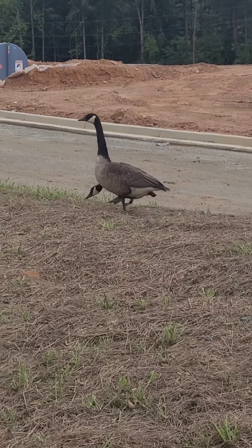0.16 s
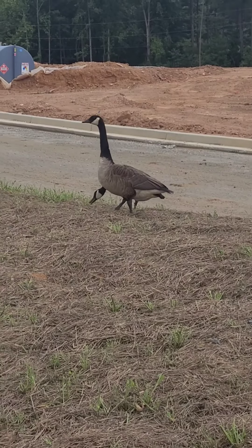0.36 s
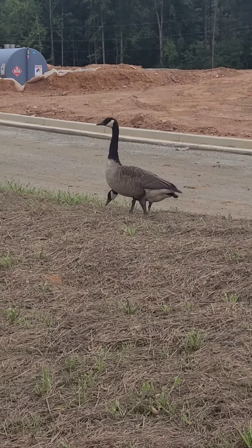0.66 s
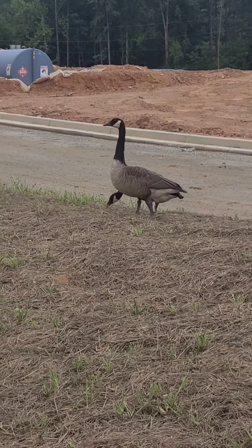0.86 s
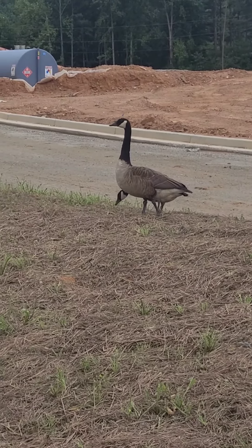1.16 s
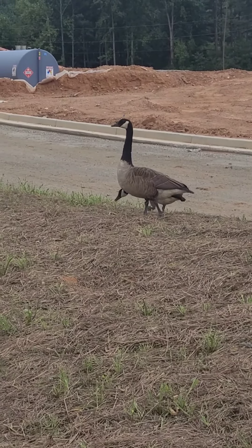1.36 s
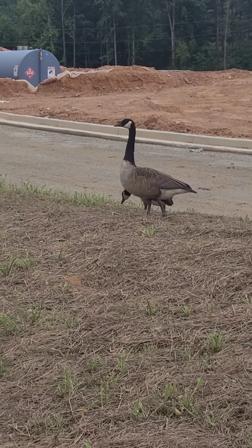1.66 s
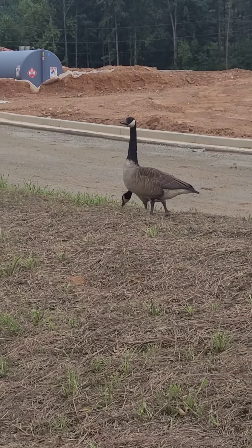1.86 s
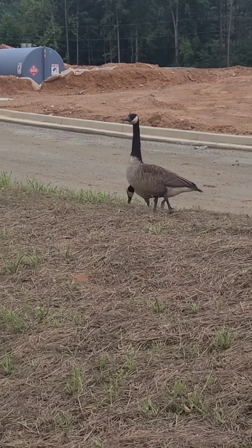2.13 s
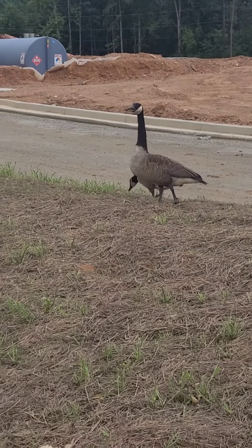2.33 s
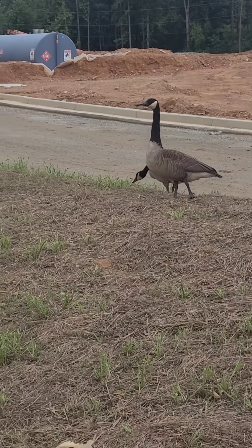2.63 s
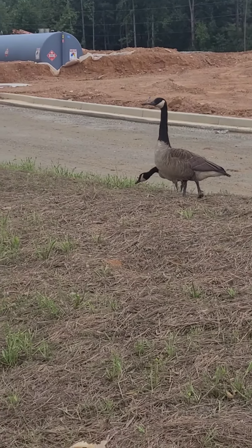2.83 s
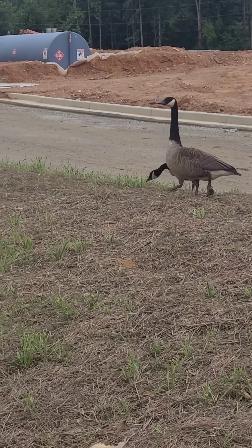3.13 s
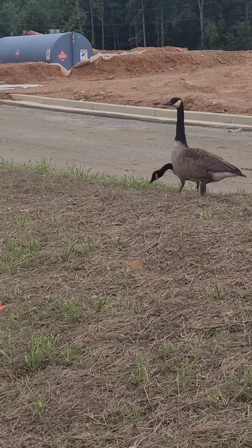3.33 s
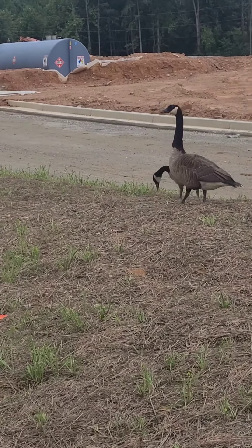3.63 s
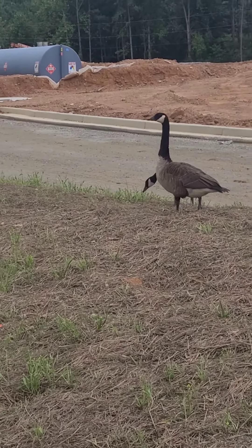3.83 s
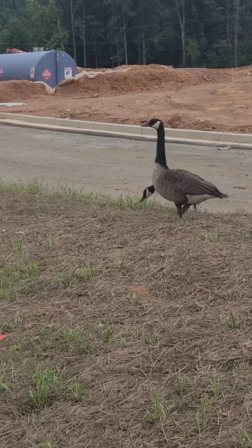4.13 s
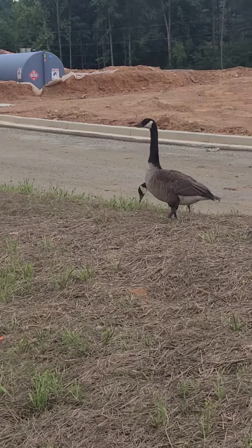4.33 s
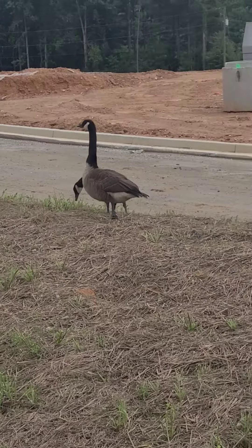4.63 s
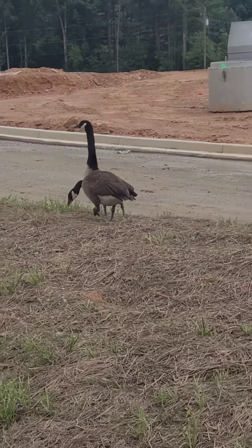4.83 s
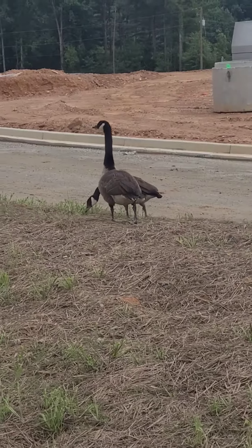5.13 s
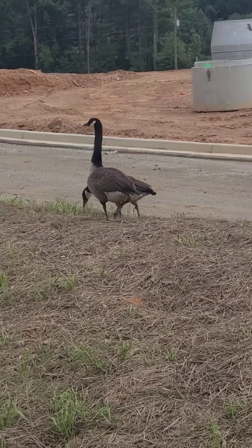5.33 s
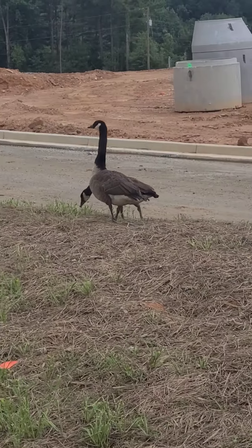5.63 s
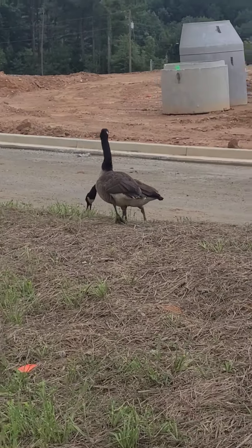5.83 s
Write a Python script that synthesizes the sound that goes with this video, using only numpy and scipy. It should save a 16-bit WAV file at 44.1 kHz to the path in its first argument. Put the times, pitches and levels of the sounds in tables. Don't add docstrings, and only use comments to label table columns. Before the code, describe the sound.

A goose gives a short grunt cracking into one honk over low distant traffic rumble, followed by dry grass ticking and rustling beside the microphone.

```python
import sys
import numpy as np
from scipy import signal
from scipy.fft import rfft, irfft
from scipy.io import wavfile
from scipy.ndimage import uniform_filter1d

SR = 44100
rng = np.random.default_rng(int(sys.argv[2]) if len(sys.argv) > 2 else 0)


def how_loud(loudness_db):
    steps = np.asarray(loudness_db, float) / 20
    return 10 ** steps


def generate_wav(sig):
    pcm = np.round(np.clip(np.atleast_2d(sig).T, -1, 1) * 32767).astype(np.int16)
    wavfile.write(sys.argv[1], SR, pcm)


N = 264159

# (frequency [Hz], density [dB per Hz])
RUMBLE = [(12, -37), (20, -27), (37, -0.5), (86, -1), (107, 1), (129, -1.5), (167, -1.5), (229, -6.5),
          (244, -10.5), (260, -10), (278, -11.5), (450, -29.5), (580, -61), (990, -120)]
# (frequency [Hz], density [dB per Hz])
TYRES = [(190, -39), (330, 0), (441, -6.5), (527, -2), (580, -1), (650, 2.5), (788, -1.5), (1110, -5),
         (1850, -19), (3150, -27), (4080, -36), (5460, -33), (6510, -48.5), (9440, -39), (15600, -61.5)]
# (frequency [Hz], left-right likeness [-1..1])
PORT_LIKENESS = [(60, 0.65), (130, 1), (290, 0.96), (640, 0.83), (1410, 0.87), (3100, -0.31),
                 (6820, -0.083), (15000, -0.17)]
# (start [s], end [s], first pitch [Hz], last pitch [Hz], level [dB])
DRONES = [(0, 1.2, 232, 234, -43), (1.1, 3.78, 234, 241.5, -37), (3.85, 4.6, 236, 238, -45),
          (4.7, 5.25, 243, 245, -41), (2.9, 3.95, 127, 128, -34), (4.2, 5.15, 128, 129.5, -32),
          (5.3, 5.7, 127, 128, -39), (5.85, 6.1, 128, 128.5, -32), (.7, 1.5, 102, 101, -38),
          (1.8, 2.7, 99, 99.5, -33), (2.8, 3.2, 99, 100, -38), (3.35, 4.0, 101, 101.5, -36),
          (4.45, 5.1, 100, 100.5, -35), (5.2, 6.1, 102, 101, -39), (.9, 1.45, 168, 166, -39),
          (1.5, 1.85, 178, 190, -38), (.1, 1.1, 79, 78, -37), (1.75, 2.3, 79, 60, -36),
          (4.1, 4.5, 72, 68, -37), (5.3, 5.65, 245, 246, -46), (5.65, 6.1, 246, 247, -40)]
# (time [s], pitch [Hz])
BIRD_PHRASES = [
    [(.895, 2900), (.925, 3080), (1.0, 3050), (1.04, 3200), (1.075, 3330), (1.11, 3600)],
    [(1.165, 3250), (1.23, 3300), (1.31, 3190), (1.35, 3200), (1.38, 3320), (1.43, 3330), (1.475, 2960)],
    [(1.525, 2970), (1.57, 3100), (1.625, 3440)],
    [(4.02, 5950), (4.115, 5830)],
    [(4.105, 5850), (4.21, 5900)],
    [(4.2, 5850), (4.3, 5760)],
    [(4.29, 5770), (4.345, 5520), (4.375, 4900), (4.397, 4480), (4.415, 4480), (4.44, 5000), (4.465, 5700)],
    [(4.49, 5980), (4.53, 5780), (4.57, 5680)],
    [(3.895, 10700), (3.915, 11000), (3.93, 11600), (3.945, 11500), (3.962, 10700)],
    [(3.97, 10600), (3.995, 10600), (4.012, 10150), (4.04, 9600), (4.065, 9600)],
]
BIRD_LEVELS = [-64.5, -64.5, -66.5, -70, -72, -67, -60.5, -67, -71, -73]
# (start [s], level [dB], centre [Hz], length [s],
# width [Hz])
FUZZY_SWELLS = [(1.09, -63, 4700, 0.09, 500), (5.262, -66, 7500, .07, 600), (5.378, -65, 7400, .05, 700),
                (3.89, -59, 4750, 0.1, 450.5), (4.14, -58, 4700, 0.033, 600), (4.504, -60, 4550, .018, 500),
                (3.955, -70, 10000, 0.018, 250), (3.66, -69, 13000, .04, 5000), (3.636, -66, 7800, .014, 600),
                (5.285, -63, 12500, .08, 6000), (3.9, -71, 12500, .07, 5000)]
# start [s], end [s], level [dB], centre [Hz], width [Hz]
LEAF_HISS = (2.35, 3.3, -73, 7300, 1500)
# (time [s], level [dB])
BREEZE = [(0, -74), (2.1, -77), (2.22, -58), (3.04, -56.5), (3.45, -64), (3.87, -57.5), (4.67, -59),
          (4.94, -60.5), (5.37, -56.5), (5.99, -63.5)]
# (frequency [Hz], density [dB per Hz])
BREEZE_COLOUR = [(1470, 5.5), (2500, -4), (3290, 2.5), (3640, 2.5), (4580, -1), (4940, 1), (5540, -1.5),
                 (6310, -15.5), (9250, -25), (15600, -22)]
# (start [s], length [s], level [dB])
SCUFFS = [(3.628, 0.045, -46.5), (3.665, 0.064, -54), (3.768, 0.057, -51), (3.808, 0.18, -55.5),
          (4.56, 0.2, -56.5), (4.587, 0.065, -65), (4.97, 0.084, -61), (5.252, 0.068, -58),
          (5.277, 0.079, -47.5), (5.322, 0.12, -48.5), (5.39, 0.087, -55.5), (5.48, 0.11, -62),
          (5.6, .07, -58), (5.938, .14, -52.5)]
# (frequency [Hz], density [dB per Hz])
SCUFF_COLOUR = [(900, -26), (1600, 9), (2600, 4.5), (3500, 3), (5000, 0), (6200, -10), (7700, -12.5),
                (9500, -20), (12000, -14), (15600, -20)]
# (time [s], peak [dB], ring [Hz], width [Hz], treble tick [dB])
SNAPS = [(2.136, -47, 4500, 2500, -24), (2.596, -42, 2920, 1500, -25), (2.6242, -35, 2700, 1000, -28),
         (2.6596, -45, 3210, 1500, -38), (2.8484, -38, 2400, 1800, -30), (3.6373, -49, 3600, 3000, -15),
         (3.718, -38, 3500, 1500, -43), (3.751, -43, 3020, 900, -35), (3.7765, -44, 2800, 1500, -30),
         (3.78, -37, 4000, 3000, -3), (3.787, -44, 2900, 1000, -35), (3.7967, -39, 3100, 1200, -35),
         (3.8632, -35, 3880, 1900, -40), (3.8916, -41, 2380, 900, -35), (4.007, -43, 3200, 900, -40),
         (4.1494, -48, 4730, 1500, -30), (4.599, -42, 2800, 1500, -35), (4.611, -40, 3200, 1300, -40),
         (4.622, -44, 3000, 1500, -40), (4.614, -46, 3080, 1300, -40), (4.9894, -55, 3400, 2000, -15),
         (5.2837, -44, 2900, 1200, -30), (5.29, -37, 2600, 1500, -30), (5.294, -34, 5200, 2800, -22),
         (5.2965, -36, 2500, 1500, -30), (5.308, -39, 2700, 1500, -30), (5.319, -31, 3200, 2500, -24),
         (5.326, -31.5, 4600, 3500, -18), (5.349, -40, 4500, 3000, -30), (5.367, -44, 4500, 2500, -30),
         (5.386, -45, 3500, 1500, -30), (5.401, -40, 3500, 3000, -30), (5.4092, -40, 4200, 2000, -25),
         (5.414, -37, 3280, 1500, -25), (5.4915, -46, 3800, 1500, -35), (5.4977, -35, 3300, 1800, -40),
         (5.5494, -52, 12000, 5000, -20), (5.712, -51, 4500, 2000, -30), (5.587, -44, 2960, 1200, -35),
         (5.6204, -53, 6000, 5000, -8), (5.8267, -45, 2400, 1500, -33)]
# (frequency [Hz], loss [dB])
COVER_LOSS = [(60, 8), (99, 22.5), (160, 17), (270, 16), (450, 23.5), (740, 26.5), (1220, 13), (2010, 21),
              (3330, 18.5), (5500, 30.5), (9080, 29), (15000, 3)]
# (frequency [Hz], gain [dB])
NEAR_SHADOW = [(1500, -3.5), (3500, -14), (4500, -15), (8000, -30), (9300, -4), (11000, -11), (15000, -16)]
# (frequency [Hz], gain [dB])
CAVITY_NOTCHES = [(5500, 0), (6600, -8), (7700, -20), (8300, 0), (10300, 0), (11000, -10), (11800, 0)]
# (start [s], length [s], level [dB], cavity [Hz])
RUB_STROKES = [(2.39, 0.054, -75, 9200), (3.628, 0.041, -67, 9200), (3.66, .1, -78, 9250),
               (3.765, 0.027, -59, 9200), (3.8, .12, -76, 9300), (3.89, 0.08, -70, 9500),
               (3.955, .07, -68, 10100), (4.01, .08, -72, 9500), (4.08, 0.23, -71, 9800),
               (4.453, 0.083, -69, 9600), (4.52, .23, -75, 9350), (5.28, 0.05, -62, 9300),
               (5.308, .04, -57, 9200), (5.343, 0.09, -67, 9250), (5.42, .08, -77, 9300),
               (5.942, .1, -65, 9300)]
# (time [s], peak [dB], pump [Hz], knock at the start [dB])
THUDS = [(0.418, -25, 77.4, -33), (0.61, -22, 82.9, -29), (0.783, -23, 100.6, -26), (0.921, -23, 83, -27),
         (1.05, -22, 59, -29), (1.134, -21, 99, -30), (1.157, -37, 67, -28), (1.856, -26, 70, -24),
         (2.121, -21, 117, -22), (2.153, -27, 75.6, -27), (3.492, -23, 70.3, -11), (3.562, -22, 66, -19),
         (3.613, -25, 83.1, -30), (3.795, -20, 82.25, -29), (3.832, -22, 66.3, -25),
         (3.859, -21.5, 56, -33), (4.015, -23, 114.1, -21), (4.042, -25, 51, -29), (4.096, -30, 97, -27),
         (4.126, -15, 88, -37), (4.716, -28, 97, -24), (5.131, -19, 107, -19), (5.149, -24, 102, -26),
         (5.217, -19, 92, -30), (5.257, -16.5, 94.2, -5), (5.293, -16, 77, -11), (5.344, -19, 89, -21),
         (5.378, -23, 117, -15)]
# (time [s], fold rate [Hz], level [dB])
HONK = [(2.24, 132, -50), (2.272, 140, -37), (2.33, 140.5, -34.5), (2.368, 143.5, -27), (2.38, 146, -32),
        (2.384, 147, -23), (2.39, 149, -22), (2.396, 148.5, -17), (2.399, 148.5, -12.5),
        (2.403, 148.5, -14.5), (2.416, 148, -14), (2.44, 144.5, -15.5), (2.454, 138.5, -26),
        (2.46, 140, -39), (2.474, 142, -42)]
# (frequency [Hz], width [Hz], gain [dB])
GRUNT_PIPE = [(666, 760, -12.5), (1130, 170, -1), (1405, 72, -2.5), (1950, 64, -16), (3440, 860, -35)]
# (frequency [Hz], width [Hz], gain [dB])
HONK_PIPE = [(570, 180, -10), (1195, 285, 3.5), (1320, 91, -5), (1510, 200, -4.5), (1820, 190, -14),
             (3050, 230, -20), (3280, 340, -14.5)]
# (frequency [Hz], width [Hz], gain [dB])
BEAK = [(1300, 200, 5), (2550, 1000, -7), (3600, 490, 6), (4730, 810, -1.5), (5330, 790, -3),
        (6300, 300, -4), (7900, 600, -15), (9050, 2000, -12.5), (10200, 1500, -15), (12500, 3500, -30)]
# (time [s], pitch [Hz], level [dB])
CRACK = [(2.364, 1440, -40), (2.38, 1400, -36), (2.3845, 1320, -22), (2.388, 1270, -27), (2.393, 1300, -26),
         (2.402, 1330, -34)]
# (time [s], pitch [Hz], level [dB])
LOW_CRACK = [(2.38, 520, -42), (2.39, 525, -26), (2.398, 570, -38)]


def evened(x):
    return x / np.sqrt(np.mean(x ** 2) + 1e-20)


def read(points, hz):
    f, value = np.transpose(points)
    return np.interp(np.log(hz + 1), np.log(f + 1), value)


def columns(rows):
    s, *values = np.transpose(rows)
    t = np.arange(N) / SR
    inside = uniform_filter1d(1. * (t > s[0]) * (t < s[-1]), size=600, mode="nearest")
    return inside, *(np.interp(t, s, v) for v in values)


def held(start, end, fade_s, release_s=None):
    t = np.arange(N) / SR
    ramp = np.minimum((t - start) / max(fade_s, .002), (end - t) / max(release_s or fade_s, .002))
    return np.sin(np.pi / 2 * np.clip(ramp, 0, 1)) ** 2


def resonate(x, hz, width):
    turn = np.exp(2j * np.pi * np.cumsum(hz * np.ones(len(x))) / SR)
    r = np.exp(-np.pi * width / SR)
    return 2 * (turn * signal.lfilter([1 - r], [1, -r], x / turn)).real


def resonate_twice(x, hz, width):
    return resonate(resonate(x, hz, width), hz, width)


def coloured(x, points):
    return irfft(rfft(x) * how_loud(read(points, np.fft.rfftfreq(N, 1 / SR))), N)


def slow(rate):
    lowpass = signal.butter(3, rate, fs=SR / 20, output="sos")
    coarse = signal.sosfilt(lowpass, rng.standard_normal(N // 20 + 2))
    return evened(np.interp(np.arange(N) / 20, np.arange(len(coarse)), coarse))


def tone(rows, waver, flutter_db):
    inside, hz, level_db = columns(rows)
    turns = np.cumsum(hz * (1 + waver * slow(9.85))) / SR
    return np.sqrt(2) * inside * how_loud(level_db + flutter_db * slow(30.6)) * np.sin(2 * np.pi * turns)


def crackle(colour, grains_per_s, spread_db, share):
    size = how_loud(spread_db * np.minimum(rng.exponential(1, N), 5)) * (rng.random(N) < grains_per_s / SR)
    grains = evened(size * rng.standard_normal(N))
    return evened(coloured(share * grains + rng.standard_normal(N), colour))


def traffic(spectrum, level_db, patchy_db, swell_db):
    frames, hz = N // 512 + 5, np.fft.rfftfreq(2048, 1 / SR)
    a, b, c, d, patches = rng.standard_normal((frames, 1025, 5)).T
    patches = evened(uniform_filter1d(uniform_filter1d(patches, size=14, axis=0), size=10, axis=1))
    swell = evened(uniform_filter1d(rng.standard_normal(frames), size=30))
    same = np.clip(read(PORT_LIKENESS, hz), -1, 1)[:, None]
    left = a + 1j * b
    right = same * left + np.sqrt(1 - same ** 2) * (c + 1j * d)
    gain_db = read(spectrum, hz)[:, None] + patchy_db * patches + swell_db * swell
    z = np.array([left, right]) * how_loud(gain_db)
    return how_loud(level_db) * evened(signal.istft(z, nperseg=2048, noverlap=1536)[1][:, :N])


def drone(start, end, first_hz, last_hz, level_db, fade_s=.12):
    rows = [(start - 1, first_hz, level_db), (start, first_hz, level_db),
            (end, last_hz, level_db), (end + 1, last_hz, level_db)]
    return held(start - fade_s, end, fade_s) * tone(rows, waver=.005, flutter_db=1.6)


def whistle(rows, level_db):
    inside, hz = columns(rows)
    hz = uniform_filter1d(hz, size=500, mode="nearest") * (1 + .006 * slow(150.))
    return inside * how_loud(level_db + 1.8 * slow(30.)) * np.sin(2 * np.pi * np.cumsum(hz) / SR)


def fuzzy_swells():
    out, noise = np.zeros(N), rng.standard_normal((len(FUZZY_SWELLS), SR // 8))
    for (s, level_db, hz, length, width), row in zip(FUZZY_SWELLS, noise):
        shape = signal.windows.tukey(round(min(length, .12) * SR), .6)
        fuzz = evened(resonate_twice(row, hz, width))[-len(shape):]
        at = round(s * SR)
        out[at:at + len(shape)] += how_loud(level_db) * shape * fuzz
    return out


def leaf_hiss(start, end, level_db, hz, width):
    gust = how_loud(level_db + 2.2 * slow(11.0)) * held(start, end, .15, 0.68)
    return gust * evened(resonate_twice(rng.standard_normal(N), hz, width))


def grass():
    steps = sum(how_loud(level_db) * held(s, s + length, 0.014, 0.064) for s, length, level_db in SCUFFS)
    breeze = how_loud(columns(BREEZE)[1] + 3.5 + 1.8 * slow(8.2))
    bed = breeze * crackle(BREEZE_COLOUR, 2700, 1.2, 0.66)
    flicker = how_loud(1.3 * slow(150.))
    return bed + steps * flicker * how_loud(0.5) * crackle(SCUFF_COLOUR, 900, 1.7, 0.54)


def snaps(ring_s=0.0012, rise_s=.0004, tick_hz=8500):
    out, t = np.zeros(N), np.arange(800) / SR
    shape = np.exp(-t / ring_s) * np.minimum(t / rise_s, 1)
    bursts = (1 + rng.standard_normal((len(SNAPS), 2, len(t)))) * shape
    bursts[..., 20] += 12
    for (s, peak_db, hz, width, treble_db), (ring, high) in zip(SNAPS, bursts):
        for _ in range(4):
            ring = resonate(ring, hz, 1.7 * width)
        tick = resonate_twice(high, tick_hz, 5000)
        at = round(s * SR)
        snap = ring / abs(ring).max() + how_loud(treble_db) * tick / abs(tick).max()
        out[at:at + len(t)] += how_loud(peak_db + 2.0) * snap
    return out


def thuds(cycles=0.55, knock_hz=400, knock_s=0.0019):
    out, t = np.zeros(N), np.arange(-1500, 1500) / SR
    phases = 2 * np.pi * rng.random((len(THUDS), 2))
    for (s, peak_db, hz, knock_db), (low, high) in zip(THUDS, phases):
        pump = np.exp(-(t * hz / cycles) ** 2) * np.sin(2 * np.pi * hz * t + low)
        knock = np.exp(-((t + 0.0053) / knock_s) ** 2) * np.sin(2 * np.pi * knock_hz * t + high)
        at = round(s * SR) - len(t) // 2
        out[at:at + len(t)] += how_loud(peak_db) * (pump + how_loud(knock_db) * knock)
    return out


def rub(width=1500, rest_hz=9300, rest_s=3.6, rest_db=-87, fade_s=0.018):
    rest = how_loud(rest_db) * held(rest_s, 9, fade_s) + how_loud(-99.5)
    strokes = np.array([how_loud(db) * held(s, s + length, fade_s) for s, length, db, _ in RUB_STROKES])
    level = rest + strokes.sum(0)
    hz = (rest * rest_hz + np.transpose(RUB_STROKES)[3] @ strokes) / level
    noise = rng.standard_normal(N) * how_loud(2.4 * slow(40.))
    return level * evened(resonate_twice(noise, hz, width))


def folds(now, hz, turns, register, second_db=-2.0, fourth_db=15.5):
    k = np.arange(1, 30)[:, None]
    low, high = (sum(how_loud(db) / (1 + 2j * (k * hz - f) / width) ** 2 for f, width, db in pipe)
                 for pipe in (GRUNT_PIPE, HONK_PIPE))
    closed = np.clip((now - 2.422) / .025, 0, 1)
    settled = np.clip((now - 2.402) / .02, 0, 1)
    lock_db = second_db * (1 - register) * (k % 2 == 0)
    lock_db = lock_db + fourth_db * register * (k % 4 == 0) * (k <= 12) * (1 - closed * (k == 12))
    lock_db = lock_db - 14 * settled * (k == 9)
    lock_db = lock_db + closed * (4 * (k == 11) - 4 * (k == 4))
    lock_db = lock_db + register * (3 * (k == 12) + 2 * (k == 7))
    partials = ((1 - register) * low + register * high) * how_loud(lock_db)
    loudness = np.sqrt((abs(partials) ** 2).sum(0) / 2)
    return (partials * np.exp(2j * np.pi * k * turns)).real.sum(0) / loudness


def breath(now, puffs):
    bright_db = 12 * (np.exp(-((now - 2.42) / .024) ** 2) - .75)
    return evened(sum(how_loud(db + bright_db * (f > 7000)) * resonate_twice(puffs, f, width)
                      for f, width, db in BEAK))


def smooth_air(peak_s=2.44, rise_s=.1, fall_s=.05, level_db=-63):
    since = np.arange(N) / SR - peak_s
    air = resonate(resonate(rng.standard_normal(N), 8500, 5000), 8500, 7000)
    return how_loud(level_db) * np.exp(-(since / np.where(since < 0, rise_s, fall_s)) ** 2) * evened(air)


def with_echo(x, echo_db=-24, echo_t60=0.3):
    t = np.arange(SR // 3) / SR
    tail = rng.choice([-1., 1.], len(t)) * (rng.random(len(t)) < .04) * (t > .012) * how_loud(-60 * t / echo_t60)
    return x + how_loud(echo_db) * signal.fftconvolve(x, tail / np.linalg.norm(tail))[:N]


def goose(break_s=2.39, break_length_s=.012, jitter=.005, shimmer_db=.6):
    span = slice(round(HONK[0][0] * SR) - 600, round(HONK[-1][0] * SR) + 600)
    inside, hz, effort_db = (c[span] for c in columns(HONK))
    effort_db = uniform_filter1d(effort_db, size=90)
    now = np.arange(N)[span] / SR
    flip = (now - break_s) / break_length_s
    register = np.clip(flip + .5, 0, 1)
    turns = np.cumsum(hz * (1 + jitter * (2 - 1.7 * register) * slow(61.0)[span])) / SR
    puffs = (0.33 + 1.2 * np.exp(-(turns % 1) / 0.36)) * rng.standard_normal(len(hz))
    rasp = evened(resonate_twice(puffs, 1280, 600)) * np.exp(-((now - 2.366) / .022) ** 2)
    voice = folds(now, hz, turns, register) + how_loud(-4) * rasp
    hiss_db = -28 + 10 * np.exp(-(2 * flip + 1) ** 2)
    effort = inside * how_loud(effort_db + shimmer_db * slow(98.0)[span])
    out = np.zeros(N)
    out[span] = effort * (voice + how_loud(hiss_db) * breath(now, puffs))
    out += tone(CRACK, 0.009, 4.8) + tone(LOW_CRACK, 0.009, 2.5)
    return with_echo(out + smooth_air())


def scene():
    near = sum(drone(*row) for row in DRONES) + sum(map(whistle, BIRD_PHRASES, BIRD_LEVELS))
    near += fuzzy_swells() + leaf_hiss(*LEAF_HISS) + grass() + snaps() + goose()
    both = np.array([near, coloured(near, NEAR_SHADOW)])
    both += traffic(RUMBLE, level_db=-30, patchy_db=0.76, swell_db=0.21)
    both += traffic(TYRES, level_db=-40, patchy_db=1.0, swell_db=0.1)
    both *= how_loud(4.5)
    covered = np.roll(coloured(both[1], [(f, -db) for f, db in COVER_LOSS]), shift=6)
    return np.array([both[0], coloured(covered + rub(), CAVITY_NOTCHES) + thuds()])


def low_pass(x):
    return signal.sosfilt(signal.butter(12, 15710, fs=SR, output="sos"), x)


def record(dry):
    hiss = how_loud(-83.0) * np.diff(rng.standard_normal((2, N + 3)), n=3) * how_loud([[0], [-12]])
    hz, _, z = signal.stft(dry + hiss, SR, nperseg=1024, noverlap=768)
    hz = hz[:, None]
    fine = uniform_filter1d(uniform_filter1d(abs(z) ** 2, size=4, axis=1), size=6, axis=2)
    broad = uniform_filter1d(uniform_filter1d(fine, size=25, axis=1), size=9, axis=2)
    strength = np.array([.5, .9])[:, None, None] * np.clip((hz - 1500) / 2500, 0, 1)
    z = z * np.clip(abs(fine / (broad + 1e-20)), .05, 1.3) ** strength
    z = z * (hz < 15650)
    mix = signal.istft(z, SR, nperseg=1024, noverlap=768)[1][:, :N]
    return low_pass(mix)


dry = scene()
out = record(dry)
generate_wav(out)
```